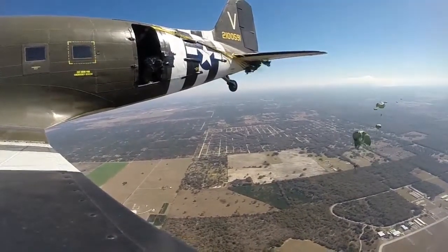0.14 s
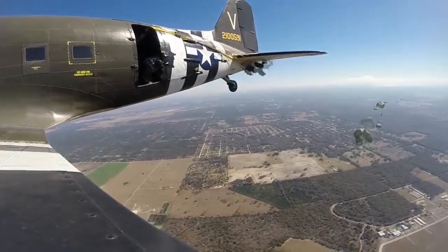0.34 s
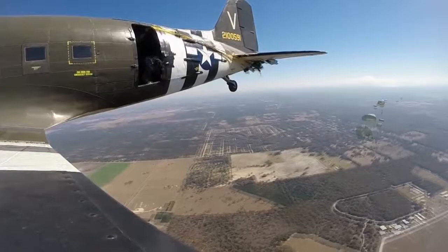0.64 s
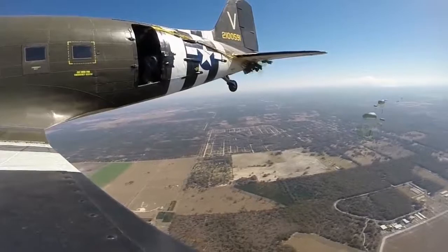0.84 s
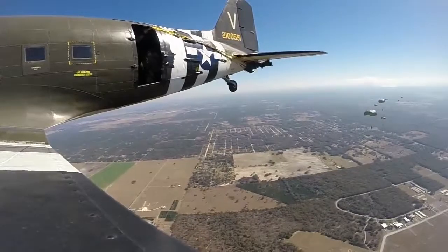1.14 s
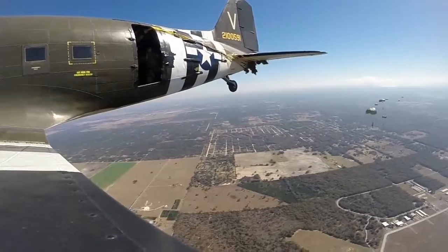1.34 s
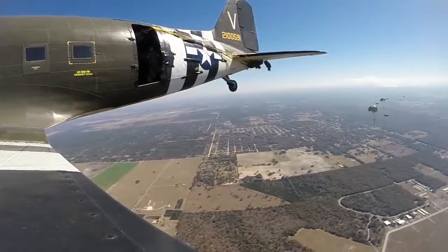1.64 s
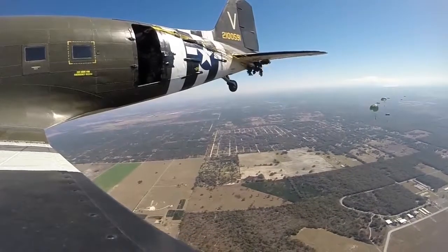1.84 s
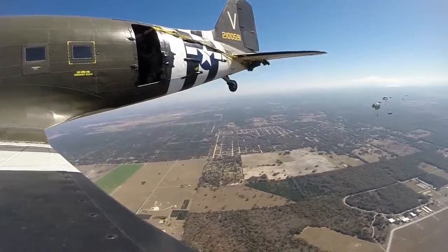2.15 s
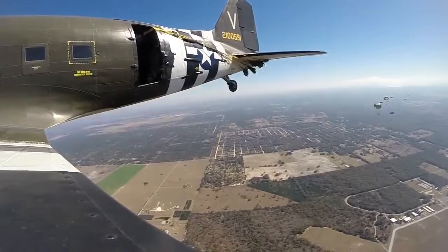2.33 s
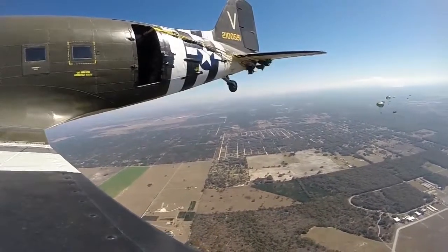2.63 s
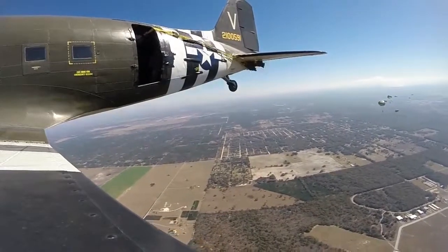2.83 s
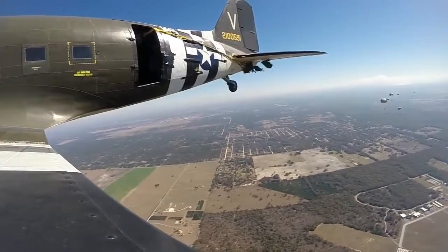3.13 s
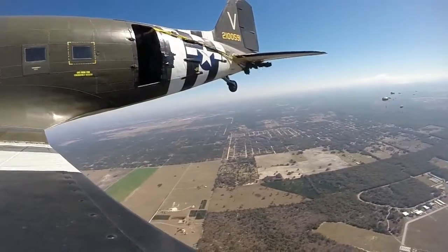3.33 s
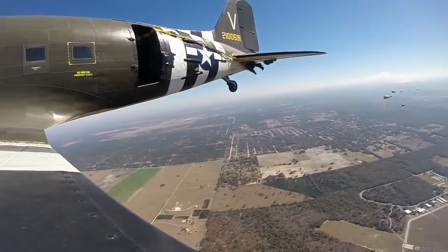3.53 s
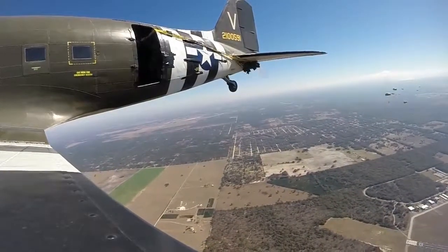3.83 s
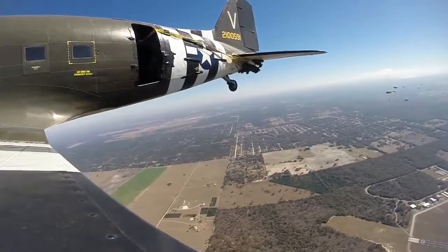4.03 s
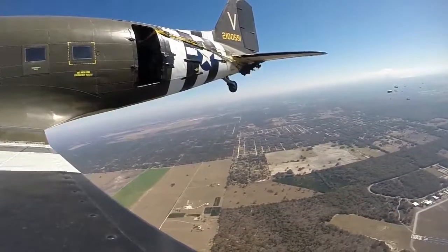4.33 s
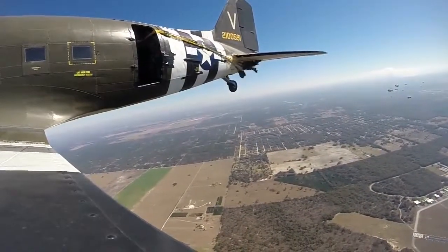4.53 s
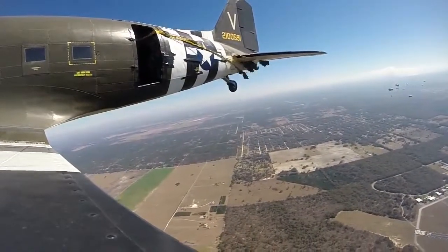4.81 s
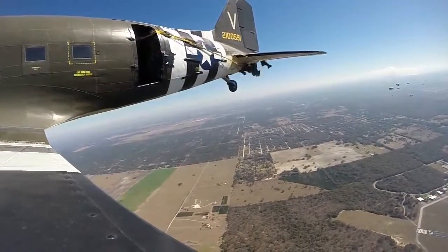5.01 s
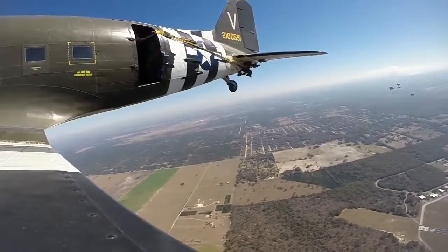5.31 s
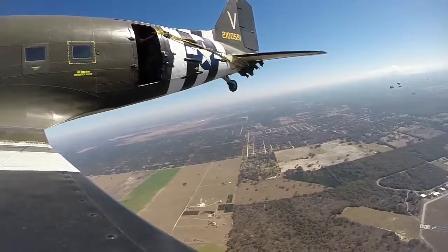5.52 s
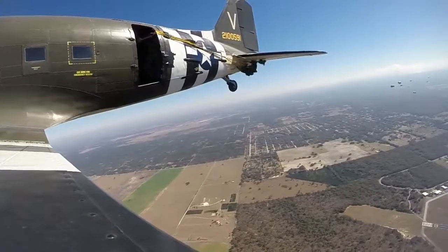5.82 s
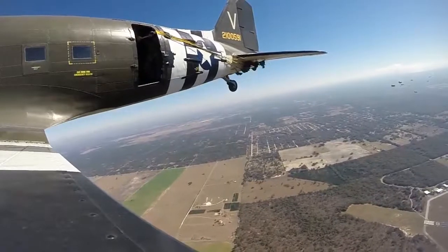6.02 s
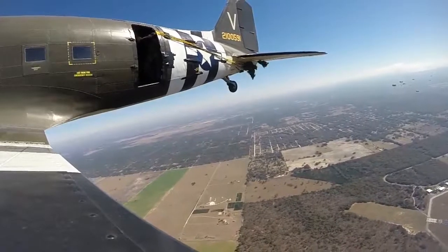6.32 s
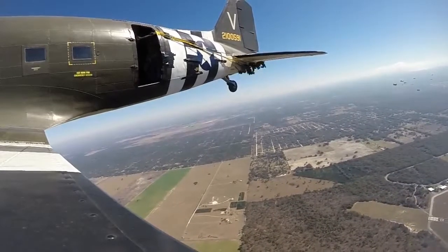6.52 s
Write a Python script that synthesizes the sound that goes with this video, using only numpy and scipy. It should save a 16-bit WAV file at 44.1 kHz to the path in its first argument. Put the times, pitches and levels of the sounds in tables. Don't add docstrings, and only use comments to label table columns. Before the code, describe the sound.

Twin piston aircraft engines drone low and steady in flight, with rushing wind and irregular dull gust thumps hitting a microphone on the wing.

```python
import sys
import numpy as np
from scipy import signal
from scipy.io import wavfile
from scipy.ndimage import uniform_filter1d

SR = 44100
rng = np.random.default_rng(int(sys.argv[2]) if len(sys.argv) > 2 else 0)


def int16_out(signal):
    q = np.round(np.clip(np.atleast_2d(signal).T, -1, 1) * 32767)
    wavfile.write(sys.argv[1], SR, q.astype(np.int16))


def boost(x):
    u = np.asarray(x, float) / 20
    return 10 ** u


N = 293706
TIME = np.arange(N) / SR

# order [cycles per engine cycle], near_engine_db [dB], far_engine_db [dB]
ENGINE_ORDERS = [(2, -10, -19), (3.375, -6.5, -12), (4, -1, -28), (5, -4.5, -10), (6, -32, -42),
                 (6.75, -17, -30), (7, -6.5, -24), (9, -18.5, -12.5), (10.5, -20, -34), (12.95, -21, -22),
                 (15, -24.5, -28), (22.1, -28, -33), (23, -23, -30)]
# pitch_hz [Hz], width_hz [Hz], level_db [dB]
WING_PANELS = [
    (143.9, 8.4, -5.5),
    (160.8, 8.2, -9.5),
    (90, 5.3, -12.5),
    (229.2, 7.3, -14),
    (266.1, 6.8, -21),
    (333.4, 24.6, -16),
    (511.5, 21, -23),
]
# pitch_hz [Hz], density_db [dB per Hz]
RUMBLE_SPECTRUM = [(8.8, -41), (15, -6), (49, -10), (76, -2), (150, -4.5), (200, -11), (324, -13.5),
                   (381, -23.5), (556, -29), (715, -20.5), (871, -29.5), (1100, -34), (1430, -66),
                   (2420, -120)]
# pitch_hz [Hz], density_db [dB per Hz]
RUSH_SPECTRUM = [(240, -6.5), (400, 0), (723, -3), (894, -7.5), (1470, -3.5), (2120, -15.5), (2400, -6),
                 (3060, -16.5), (3400, -16), (4010, -20), (6620, -24.5), (8190, -33.5), (11300, -40),
                 (13300, -47), (15000, -55)]
# pitch_hz [Hz], width_hz [Hz], level_db [dB]
HOUSING_CAVITY = [(684, 170, 3), (842, 217, -5.5), (1370, 260, 3), (1483, 62, 3.5), (1900, 270, 8),
                  (2070, 240, 2), (2280, 250, 0.5), (3420, 160, 5.5), (4070, 150, -4), (4455, 240, 4),
                  (4890, 200, -5), (5176, 215, 7), (6560, 160, 6.5), (7400, 420, 6.5), (8100, 300, -1.5),
                  (8800, 700, 4), (11160, 500, 6.5), (12200, 500, 3), (13050, 200, -1), (14200, 500, 6)]
# time_s [s], airflow_db [dB], shedding_db [dB]
AIR_SWINGS = [(.3, 0.5, -10), (1.0, -.5, -2), (1.24, 3, -0.5), (1.7, -.5, 1.5), (1.9, 1.5, -4),
              (2.6, 1.5, -5), (2.76, -1.5, 4), (2.92, 0.5, -6), (3.3, -1, -4), (3.75, -0.5, -19),
              (4.08, -0.5, 2), (4.25, -3.5, 3), (4.4, -0.5, 1), (5.1, 1, -2.5), (5.6, -2, 0.5),
              (5.88, 1, 3), (6.2, 0.5, -3), (6.6, 1.5, -1)]
# start_s [s], duck_db [dB], thump_db [dB]
HARD_GUSTS = [(0.651, 1.5, -10), (0.749, 2, -7), (0.855, 2.5, -10), (1.024, 2.5, -11), (1.27, 3.5, -8),
              (1.445, 2, -11), (1.559, 1, -7.5), (1.631, 0.5, -19), (1.912, 3, -8), (1.979, 4, -7),
              (2.29, 2, -14), (2.664, 2.5, -4), (2.74, 2.5, -3), (3.001, 4, -6), (3.284, 5, -4),
              (3.864, 1, -14), (4.143, 4.5, -10), (4.263, 2.5, -8), (4.417, 3, -10), (4.627, 2, -5.5),
              (4.752, 1.5, -7), (5.045, 1, -8), (5.193, 3.5, -12), (5.344, 1.5, -7), (5.481, 1.5, -10),
              (5.97, 2.5, -10), (6.4, 1.5, -11)]

NEAR_HZ, FAR_HZ = 17.748, 17.664
IN_STEP_S = 3.55
DRONE_DB, RUSH_DB, BUFFET_DB = -15.5, -27.0, -21
TONES_DB, PANELS_DB, RUMBLE_DB = -2.2, -8.0, -4.6
DRONE_FOLLOWS = 0.63
SURGE, SURGE_LEAD_S, SURGE_S = 0.41, 0.023, 0.034
THUMP_S = 0.0038
DUCK_ATTACK_S, DUCK_RELEASE_S = 0.0023, 0.077
FADE_START_S, FADE_IN_S, FADE_BEND, FADE_OUT_S = 0.016, 0.92, 1.13, 0.11


def evened(x):
    return x / np.sqrt(np.mean(x ** 2) + 1e-20)


def read(points, hz):
    point_hz, value = np.transpose(points)
    return np.interp(np.log(hz + 1), np.log(point_hz + 1), value)


def wander(hz):
    size = int(SR / hz)
    once = uniform_filter1d(rng.standard_normal(N), size)
    return evened(uniform_filter1d(once, size))


def resonate(x, hz, width_hz):
    turn = np.exp(2j * np.pi * hz * TIME)
    decay = np.exp(-np.pi * width_hz / SR)
    two_poles = np.convolve([1, -decay], [1, -decay])
    return (turn * signal.lfilter([1], two_poles, x / turn)).real


def turbulence(spectrum, patchy_db, size):
    hz = np.fft.rfftfreq(size, 1 / SR)
    real, imaginary, patches = rng.standard_normal((4 * N // size + 5, len(hz), 3)).T
    patches = uniform_filter1d(patches, size=10, axis=0)
    patches = evened(uniform_filter1d(patches, size=8, axis=1))
    cavity_db = sum(db / (1 + (2 * (hz - f) / w) ** 2) for f, w, db in HOUSING_CAVITY)
    colour_db = read(spectrum, hz) + cavity_db
    frames = (real + 1j * imaginary) * boost(colour_db[:, None] + patchy_db * patches)
    return evened(signal.istft(frames, nperseg=size, noverlap=3 * size // 4)[1][:N])


def engines():
    out = np.zeros(N)
    for order, near_db, far_db in ENGINE_ORDERS:
        start = rng.random()
        for hz, db in ((NEAR_HZ, near_db), (FAR_HZ, far_db)):
            cycles = hz * (TIME - IN_STEP_S) + 0.0044 * wander(hz=1.7)
            level = boost(db + 1.0 * wander(hz=3.2))
            out += level * np.sin(2 * np.pi * (order * cycles + start))
    return evened(out)


def panels():
    out = np.zeros(N)
    for hz, width_hz, db in WING_PANELS:
        out += boost(db) * evened(resonate(rng.standard_normal(N), hz, width_hz))
    return evened(out)


def drone():
    rumble = turbulence(RUMBLE_SPECTRUM, patchy_db=1.3, size=4096)
    return boost(TONES_DB) * engines() + boost(PANELS_DB) * panels() + boost(RUMBLE_DB) * rumble


def buffeting():
    return evened(resonate(rng.standard_normal(N), hz=44.0, width_hz=3.4))


def surges():
    swell_db = np.zeros(N)
    for start_s, duck_db, _ in HARD_GUSTS:
        swell_db += SURGE * duck_db * np.exp(-((TIME - start_s + SURGE_LEAD_S) / SURGE_S) ** 2)
    return swell_db


def rush(flow_db):
    flicker_db = 0.37 * wander(hz=25.2) + 1.05 * wander(hz=150)
    level = boost(RUSH_DB + flow_db + surges() + flicker_db)
    return level * turbulence(RUSH_SPECTRUM, patchy_db=0.6, size=1024)


def thumps():
    out = np.zeros(N)
    sides = rng.choice([-1., 1.], len(HARD_GUSTS))
    for (start_s, _, thump_db), side in zip(HARD_GUSTS, sides):
        u = (TIME - start_s) / THUMP_S
        out += side * boost(thump_db) * (1 - u ** 2) * np.exp(-u ** 2 / 2)
    return out


def scene():
    time_s, airflow_db, shedding_db = np.transpose(AIR_SWINGS)
    flow_db = np.interp(TIME, time_s, airflow_db)
    shed_db = np.interp(TIME, time_s, shedding_db)
    structure = boost(DRONE_DB + DRONE_FOLLOWS * flow_db) * drone()
    mount = boost(BUFFET_DB + shed_db) * buffeting()
    return (structure + mount + rush(flow_db) + thumps())[None]


def low_pass(x):
    return signal.sosfilt(signal.butter(12, 15180, fs=SR, output="sos"), x)


def record(dry):
    ducking_db = np.zeros(N)
    for start_s, duck_db, _ in HARD_GUSTS:
        since = np.maximum(TIME - start_s, 0)
        ducking_db += duck_db * (1 - np.exp(-since / DUCK_ATTACK_S)) * np.exp(-since / DUCK_RELEASE_S)
    ducked = dry * boost(1.27 - ducking_db)
    ceiling = 0.85
    limited = ducked / (1 + abs(ducked / ceiling) ** 4) ** 0.24
    fade_in = np.clip((TIME - FADE_START_S) / FADE_IN_S, 0, 1) ** FADE_BEND
    fade_out = np.clip(0.47 + (N / SR - TIME) / FADE_OUT_S, 0, 1)
    return low_pass(limited * fade_in * fade_out)


dry = scene()
out = record(dry)
int16_out(out)
```